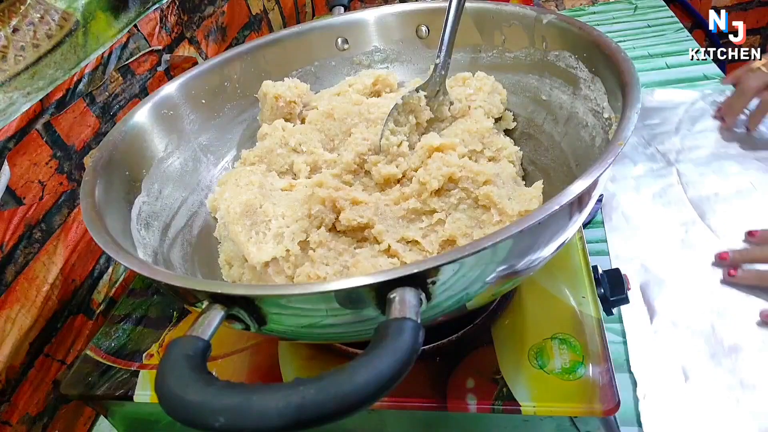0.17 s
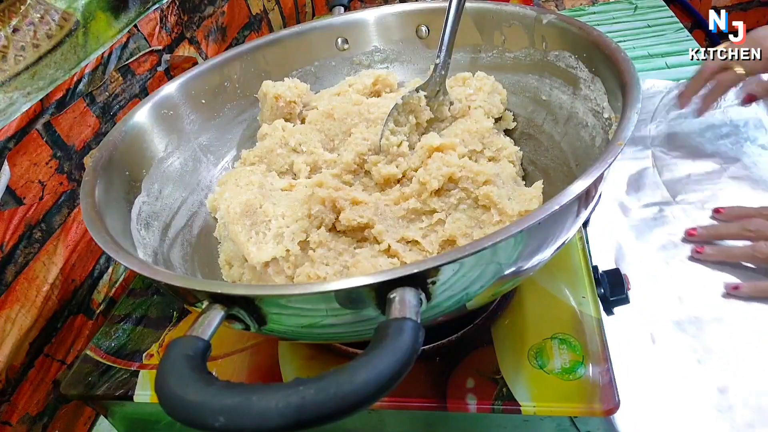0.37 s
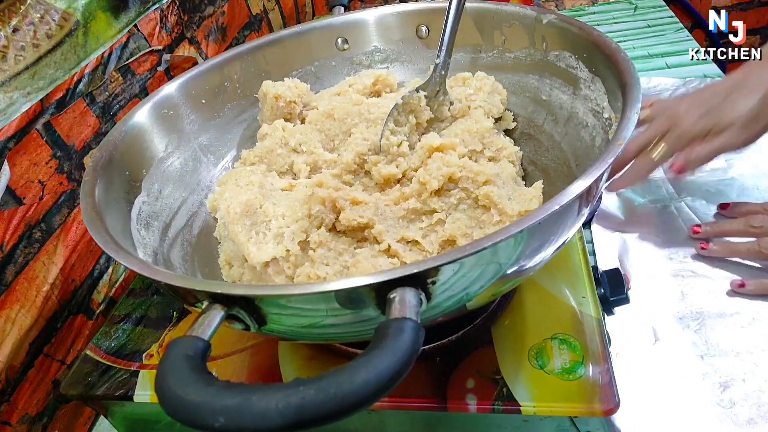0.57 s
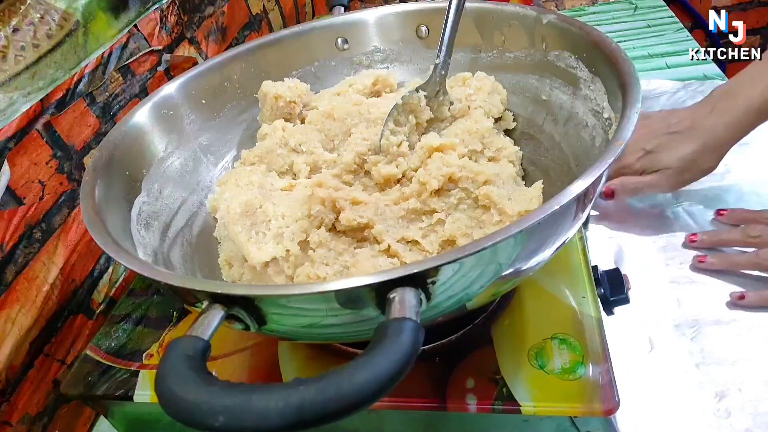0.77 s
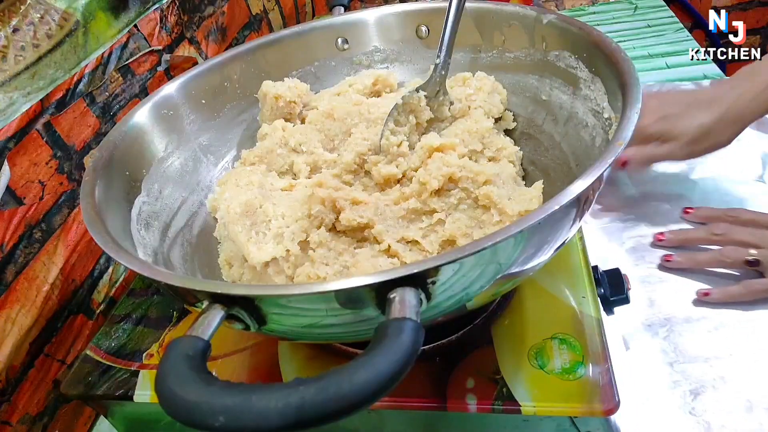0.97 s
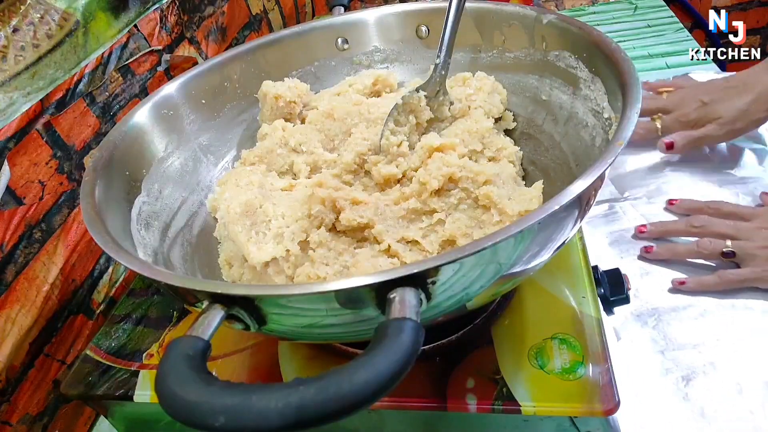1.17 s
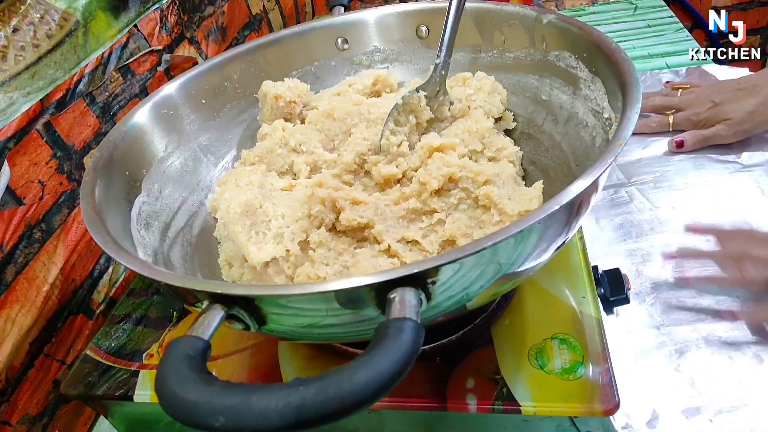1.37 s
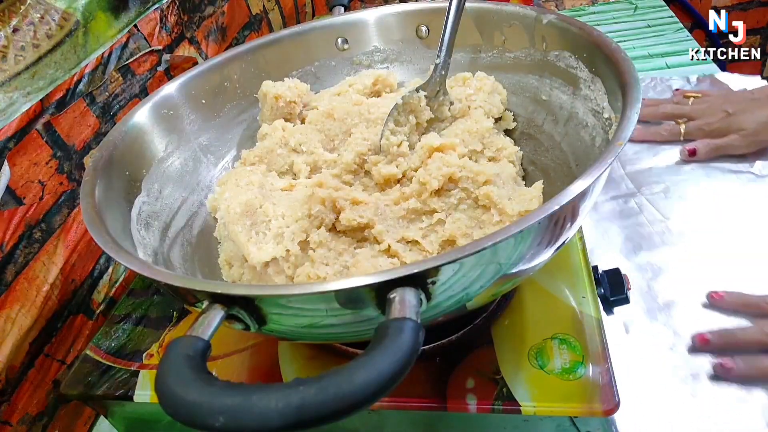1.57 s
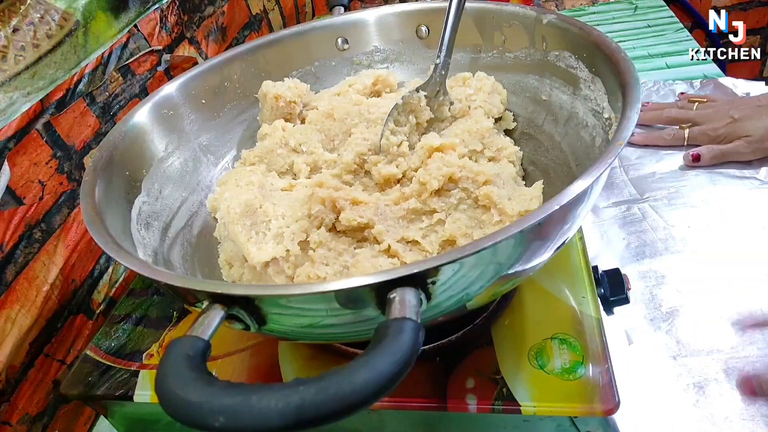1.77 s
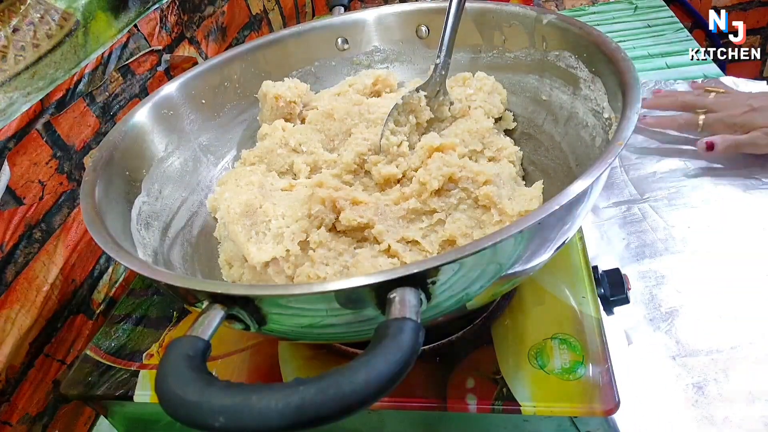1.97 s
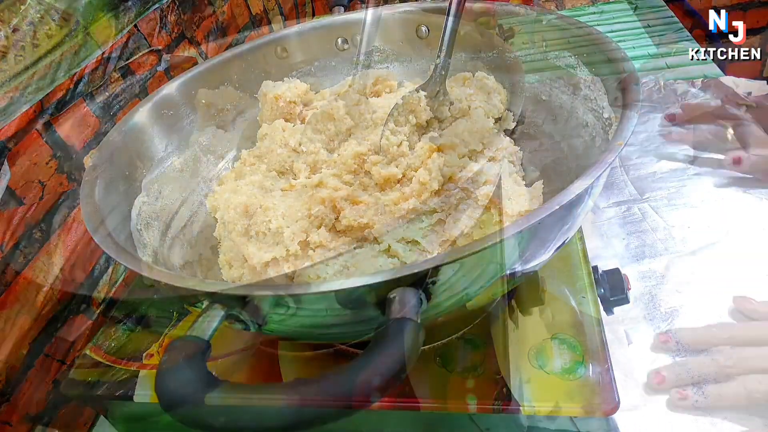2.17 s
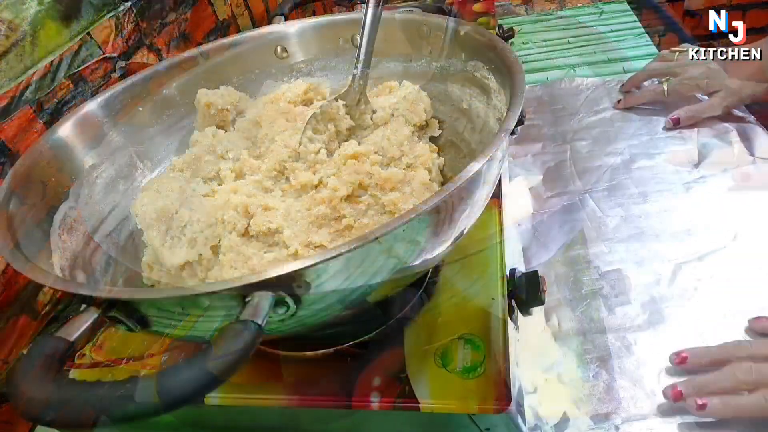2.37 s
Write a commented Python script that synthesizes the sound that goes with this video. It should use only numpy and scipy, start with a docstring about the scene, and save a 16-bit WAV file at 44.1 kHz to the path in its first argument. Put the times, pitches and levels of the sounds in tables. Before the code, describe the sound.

Aluminium foil crackles and rustles as hands spread it flat, with a few dull knocks.

```python
"""A sheet of aluminium foil crackles as two hands spread it on a kitchen table, a little to the left.
Creases snap by the thousand, the sheet buckles in short bright bursts, palms rub it flat
and fingertips skid with a narrow hiss. Knocks ring dully in the table and the cookware on it,
over a low rumble, in a live room."""
import sys
import numpy as np
from scipy import signal
from scipy.fft import rfft, irfft, next_fast_len
from scipy.io import wavfile

SR = 44100
rng = np.random.default_rng(int(sys.argv[2]) if len(sys.argv) > 2 else 0)


def master_out(mix):
    """Clip the mix to full scale and print it as 16-bit PCM to the path in sys.argv[1]."""
    frames = np.transpose(np.atleast_2d(mix))
    ceiling = np.clip(frames, -1, 1)
    pcm = np.round(ceiling * 32767).astype(np.int16)
    wavfile.write(sys.argv[1], SR, pcm)


N = 106369
T = np.arange(N) / SR
CREASES_PER_S = 4000
FOIL_ROOM_DB = 2.5   # reverb over direct sound


def from_db(db):
    """Decibels to gain."""
    return 10 ** (np.asarray(db) / 20)


def at_hz(points, hz):
    """Reads a table on a log-frequency axis."""
    f, v = np.transpose(points)
    return np.interp(np.log(np.maximum(hz, 1)), np.log(f), v)


def level(rows):
    """Gain envelope from rows of t/s, level/dB."""
    return from_db(np.interp(T, *np.transpose(rows)))


def swell(middle, length):
    """A stroke that rises and fades around its middle."""
    return np.exp(-2 * ((T - middle) / length) ** 2)


def colour(x, spectrum, tilt_db=0):
    """Equalises white sound and keeps its power; the tilt is per octave."""
    size = next_fast_len(N + SR // 4)
    hz = np.maximum(np.fft.rfftfreq(size, 1 / SR), 1)
    gain = from_db(at_hz(spectrum, hz) + tilt_db * np.log2(hz))
    return irfft(rfft(x, size) * gain / np.sqrt(np.mean(gain ** 2)), size)[..., :N]


def stereo_noise(size):
    """Diffuse white noise, centred in the bass and wide above."""
    # likeness of the two sides: f/Hz, correlation
    likeness = [(100, 0.98), (170, 0.94), (300, 0.69), (500, 0.6), (1000, -0.055), (16000, 0.0055)]
    mid, side = rfft(rng.standard_normal((2, size)))
    alike = at_hz(likeness, np.fft.rfftfreq(size, 1 / SR))
    return irfft(np.sqrt((1 + alike) / 2) * mid + np.sqrt((1 - alike) / 2) * side * [[1], [-1]], size)


def kitchen():
    """The room's diffuse echo, dying faster in the treble; unit energy per side."""
    # reverb time: f/Hz, t60/s
    room_t60 = [(200, 0.52), (1000, 0.44), (3500, 0.4), (7000, 0.29), (14000, 0.21)]
    t, hz = T[:SR // 2], np.fft.rfftfreq(SR // 2, 1 / SR)
    noise = rfft(stereo_noise(len(t)))
    centres, echo = np.geomspace(200, 14000, 8), 0
    for centre, share in zip(centres, np.eye(len(centres))):
        band = irfft(noise * at_hz(np.c_[centres, share], hz), len(t))
        echo += band * from_db(-60 * t / at_hz(room_t60, centre))
    echo *= 1 - np.exp(-t / .0013)   # soft onset
    return echo / np.sqrt(np.sum(echo ** 2) / 2)


def place(x, echo, room_db, pan_db=0, extra_lag_s=0):
    """Direct sound, reaching the left side first, plus the room; positive pan is left."""
    right_lag_s = .00031 + extra_lag_s
    late = np.pad(x, (int(right_lag_s * SR + .5), 0))[:N]
    direct = np.array([x * from_db(pan_db / 2), late * from_db(-pan_db / 2)])
    wet = from_db(room_db)
    return (direct + wet * signal.fftconvolve(x[None], echo, axes=1)[:, :N]) / np.hypot(1, wet)


def scatter(snaps, spectrum, echoes, pan_db=0, tilt_db=0):
    """Each snap comes from one of several spots on the sheet, with a path and an echo of its own."""
    spot, out = rng.integers(0, len(echoes), N), 0
    for k, lag_s in enumerate(np.linspace(-.00003, .00003, len(echoes))):
        sound = colour(snaps * (spot == k), spectrum, tilt_db)
        out += place(sound, echoes[k], FOIL_ROOM_DB, pan_db, lag_s)
    return out


def creases(per_s, spread_db=3):
    """Tiny snaps at random moments, many weak and a few strong; rms 1."""
    sizes = from_db(spread_db * np.minimum(rng.exponential(1, N), 4.5))
    snaps = sizes * rng.choice([-1, 1], N) * (rng.random(N) < per_s / SR)
    return snaps / snaps.std()


def background():
    """The table's low rumble over quiet room tone."""
    # rumble envelope: t/s, level/dB
    rumble_level = [(0, -23.5), (.06, -29), (.16, -36), (.4, -39.5), (.6, -44.5), (.8, -44.5), (1.1, -39),
                    (1.3, -46.5), (1.6, -46.5), (1.9, -48.5), (2.41, -46)]
    # rumble spectrum: f/Hz, level/dB
    rumble_eq = [(12, -16.5), (26, 1.5), (45, -11.5), (68, 0), (95, -17), (140, -12), (200, -15),
                 (300, -46), (800, -28), (8000, -78)]
    # room tone spectrum: f/Hz, level/dB
    air_eq = [(30, -6), (100, 1.5), (190, 1.5), (290, -10), (450, -12.5), (900, -18), (1800, -16.5),
              (3300, -15), (6000, -25.5), (9000, -43.5), (16000, -33)]
    rumble = level(rumble_level) * colour(stereo_noise(N), rumble_eq)
    lean_right = from_db([[-1], [1]])
    return rumble * lean_right + from_db(-50) * colour(stereo_noise(N), air_eq)


def ring(x, hz, t60):
    """One decaying mode, driven by x."""
    r, w = from_db(-60 / (t60 * SR)), 2 * np.pi * hz / SR
    return signal.lfilter([0, np.sin(w)], [1, -2 * r * np.cos(w), r * r], x + 1e-18)


def knocks(echo):
    """Soft blows on the table: a short thud, ringing modes and a deep thump."""
    # knocks: t/s, ring level/dB, contact cut-off/Hz, thump level/dB, thud level/dB
    hits = [(.001, -18, 400, -20.5, -19.5), (0.7994, -26, 1150, -37.5, -19), (.85, -39, 980, -51, -38),
            (1.012, -38, 900, -38, -33), (1.084, -43.5, 390, -32.5, -62)]
    # modes of table and cookware: f/Hz, level/dB, t60/s
    modes = [(245, -10, .2), (310.4, -0.5, 0.37), (326, -16, 0.17), (383, -14, 0.048), (569, -2.5, 0.083),
             (621, -12, 0.37), (670, -18, 0.041), (838, -17, .12), (1080, -22, 0.1), (1257, -13, 0.066)]
    # thud spectrum: f/Hz, level/dB
    thud_eq = [(120, -46), (230, -4), (330, 4.5), (390, -1.5), (470, -8.5), (580, -3.5), (1200, -7),
               (1800, -11), (5000, -11), (12000, -55)]
    rise_s, decay_s = .003454, .01   # a soft contact bears down, then lets go
    blows, thuds, thumps = np.zeros((3, N))
    for s, db, contact_hz, thump_db, thud_db in hits:
        click = signal.unit_impulse(N, int((s + rise_s) * SR))
        soft = signal.butter(2, contact_hz, fs=SR)
        press = np.clip((T - s) / rise_s, 0, 1) * np.exp(-np.maximum(T - s - rise_s, 0) / decay_s)
        blows += signal.lfilter(*soft, click) * from_db(db)
        thuds += signal.lfilter(*soft, rng.standard_normal(N) * press) * from_db(thud_db)
        thumps += click * from_db(thump_db)
    body = sum(ring(blows, hz, t60) * from_db(db) for hz, db, t60 in modes)
    # the table radiates little low ringing
    body = signal.sosfilt(signal.butter(5, 248, "high", fs=SR, output="sos"), body)
    near_middle = dict(pan_db=-2.5, extra_lag_s=-.00012)
    ringing = place(body, echo, room_db=-10, **near_middle)
    thud = place(colour(thuds, thud_eq), echo, room_db=-2, **near_middle)
    return ringing + thud + ring(thumps, hz=75.2, t60=.51)


def skids(echo):
    """Fingertips catch and slip, hissing in one narrow band."""
    # fingertip skids: middle t/s, level/dB, length/s, centre f/Hz
    slips = [(0.913, -36, .025, 6500), (1.007, -47, 0.025, 7800), (1.365, -31, 0.029, 7900),
             (1.397, -32.5, 0.023, 6350), (2.353, -37, .016, 2420)]
    width = .26   # share of the centre frequency
    out = 0
    for s, db, length, hz in slips:
        hiss = signal.lfilter(*signal.iirpeak(hz, 1 / width, fs=SR), creases(CREASES_PER_S))
        out += hiss / hiss.std() * from_db(db) * swell(s, length)
    return place(out, echo, FOIL_ROOM_DB)


def rubs(echoes):
    """A palm slides over the foil: a soft rub with a grainy swish under it."""
    # palm strokes: middle t/s, rub level/dB, length/s, swish level/dB
    strokes = [(0.068, -36.5, 0.023, -52), (0.266, -41, 0.21, -37.5), (0.714, -51, 0.18, -51.5),
               (0.885, -50, 0.036, -38), (1.015, -36.5, 0.028, -62), (1.136, -39, 0.066, -29.5),
               (1.269, -40.5, .022, -23), (1.396, -48, 0.05, -41), (1.655, -52, 0.27, -48),
               (1.936, -44, 0.036, -76), (2.351, -51.5, 0.071, -41.5)]
    # spectrum of the palm's rub: f/Hz, level/dB
    rub_eq = [(100, -26), (190, -4), (280, 5), (430, -3.5), (600, 3.5), (800, -1), (1150, 3), (1700, -5),
              (3000, -5), (8000, -43), (16000, -50)]
    # spectrum of the foil's swish: f/Hz, level/dB
    swish_eq = [(500, -44), (1500, -26.5), (2300, -10), (3000, 2), (3800, 4.5), (5000, 5), (8000, -2),
                (16000, -50)]
    rub_gain = sum(from_db(db) * swell(s, length) for s, db, length, _ in strokes)
    swish_gain = sum(from_db(db) * swell(s, length) for s, _, length, db in strokes)
    rub = scatter(rub_gain * rng.standard_normal(N), rub_eq, echoes)
    swish = scatter(swish_gain * creases(CREASES_PER_S), swish_eq, echoes)
    return rub + swish


def buckles(echoes, release_s=.0074):
    """Each buckle of the sheet sets off a brief avalanche of snaps around two spots."""
    # buckles: t/s, level/dB, rise/s, length/s, tilt/(dB per octave), pan/dB
    bursts = [(.012, -19, 0.0038, 0.011, 4, 0), (.179, -25.5, 0.0017, 0.02, -3, 4),
              (.315, -21, 0.0025, 0.0058, -2, -2), (.757, -39.5, .005, 0.013, 4, 3),
              (1.002, -30, .008, 0.029, 5.5, 14), (1.055, -25.5, 0.0059, 0.019, 3, -2),
              (1.258, -18, 0.0025, 0.028, 4, 3.5), (1.532, -25, 0.0082, 0.012, 1.5, 7),
              (1.55, -20, 0.0029, 0.016, 3, 6), (1.58, -29, .005, 0.011, 15, 6),
              (1.765, -38, 0.012, 0.013, 6.5, 18.5), (1.897, -43, .004, .006, 2, 6),
              (2.013, -31, 0.0025, 0.02, 2.5, 4.5), (2.261, -42.5, .005, .008, 9, 3),
              (2.303, -39, .008, 0.017, -3, 14)]
    # buckle spectrum: f/Hz, level/dB
    buckle_eq = [(200, -17), (1000, -28), (2000, -14), (3100, -7.5), (4500, -4), (5800, 1.5), (7200, 0),
                 (8100, -8), (10300, -8.5), (12500, -16.5), (16000, -22)]
    snaps, out = creases(per_s=14000), 0
    for k, (s, db, rise, length, tilt_db, pan_db) in enumerate(bursts):
        shape = np.clip((T - s) / rise, 0, 1) * np.exp(-np.maximum(T - s - length, 0) / release_s)
        two_spots = np.roll(echoes, k, axis=0)[:2]
        out += scatter(snaps * shape * from_db(db), buckle_eq, two_spots, pan_db, tilt_db)
    return out


def clumps(per_s=55, depth_db=2.24):
    """Gain that wavers as the hands catch and slip."""
    knots = rng.standard_normal(N // 100)
    return from_db(depth_db * np.interp(T * per_s, np.arange(len(knots)), knots))


def crackle(echoes):
    """Creases give way in clumps while the hands move the sheet."""
    # crackle envelope: t/s, level/dB
    handling = [(0, -27), (.07, -25.5), (.125, -34.5), (.17, -27.5), (.225, -21.5), (.36, -25), (.46, -32),
                (.53, -51.5), (.61, -49.5), (.66, -43), (.74, -53), (.82, -39.5), (.9, -31.5), (.98, -34),
                (1.08, -39), (1.17, -34.5), (1.24, -36), (1.34, -45), (1.405, -32), (1.455, -92),
                (1.53, -70), (1.66, -40), (1.73, -46.5), (1.87, -50.5), (1.99, -57), (2.1, -45.5),
                (2.16, -42), (2.24, -53), (2.295, -44), (2.335, -36.5), (2.41, -39.5)]
    # spectrum of a crease snapping: f/Hz, level/dB
    crease_eq = [(200, -57), (700, -33.5), (1300, -17.5), (2000, -14), (3100, -8), (4500, -5.5), (5800, 0),
                 (7200, -1), (8100, -7), (10300, -8), (12500, -12), (16000, -15.5)]
    # where the hands work: t/s, pan/dB
    hand_pan = [(0, 9.5), (.15, 3), (.3, 7.5), (.46, 3), (.75, 7), (.92, 3.5), (1.1, 7), (1.22, 6),
                (1.36, 4), (1.7, 1), (2.15, 6.5), (2.36, 9.5)]
    effort = level(handling)
    snaps = creases(CREASES_PER_S) * effort * clumps()
    dull = signal.filtfilt(*signal.butter(2, 8100, fs=SR), snaps)
    treble_gain = (effort / effort.max()) ** -.03   # a slight lift in the quiet passages
    snaps = dull + (snaps - dull) * treble_gain
    return scatter(snaps, crease_eq, echoes, pan_db=np.interp(T, *np.transpose(hand_pan)))


def scene():
    """Foil, hands and table in one room, with an echo for each of five spots on the table."""
    echoes = np.array([kitchen() for _ in range(5)])
    foil = crackle(echoes) + buckles(echoes) + rubs(echoes) + skids(echoes[1])
    return foil + knocks(echoes[2]) + background()


def record(dry):
    """A steep low-pass cuts the top at 15.9 kHz."""
    return signal.sosfilt(signal.ellip(12, .1, 90, 15900, fs=SR, output="sos"), dry)


dry = scene()
out = record(dry)
master_out(out)
```